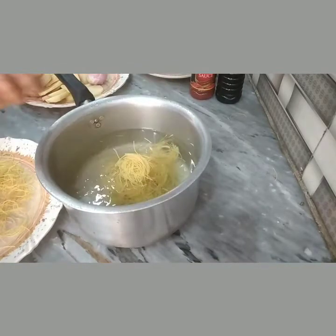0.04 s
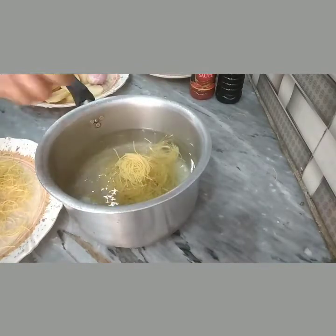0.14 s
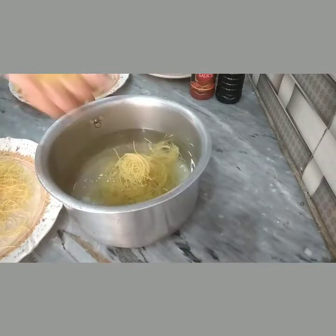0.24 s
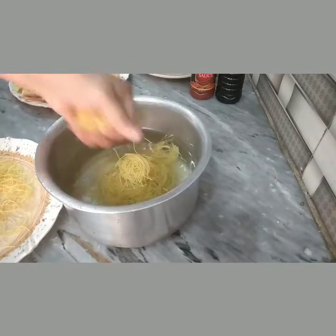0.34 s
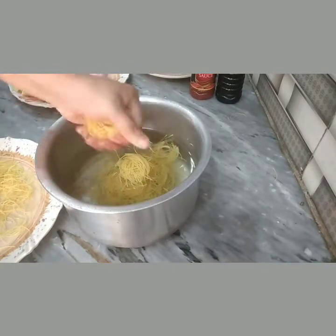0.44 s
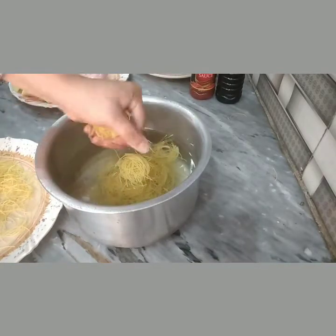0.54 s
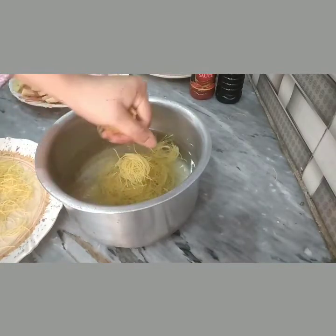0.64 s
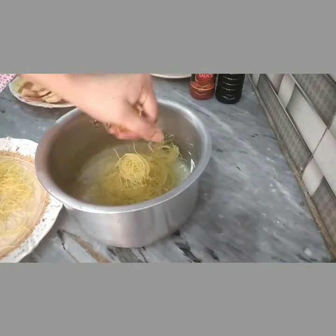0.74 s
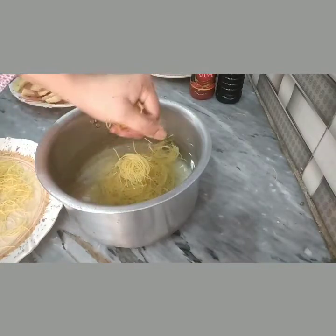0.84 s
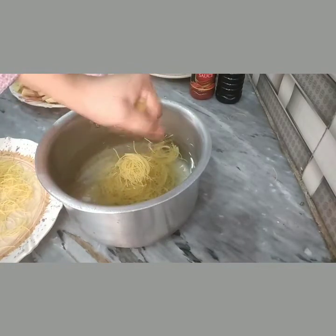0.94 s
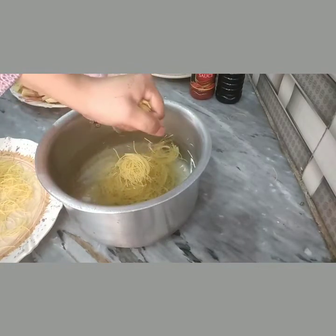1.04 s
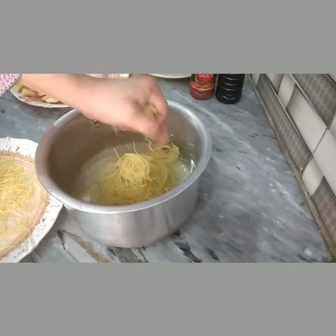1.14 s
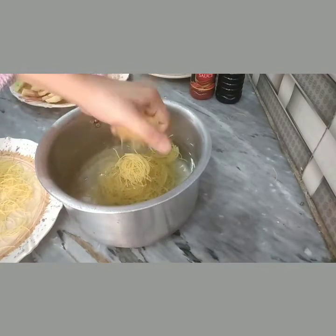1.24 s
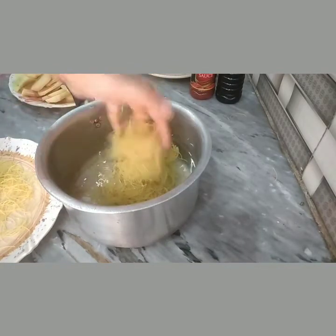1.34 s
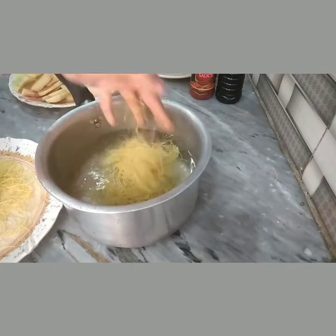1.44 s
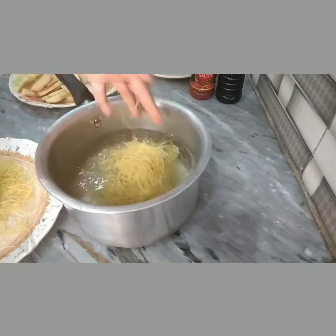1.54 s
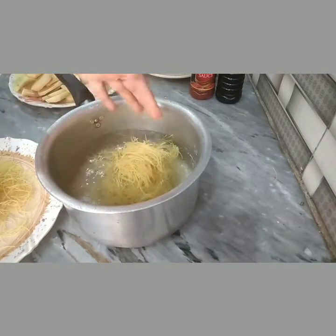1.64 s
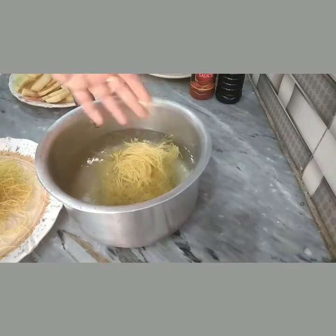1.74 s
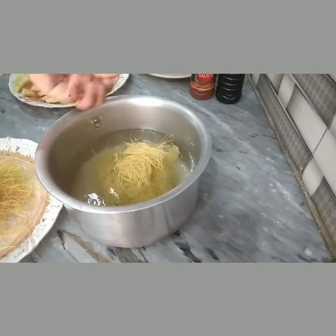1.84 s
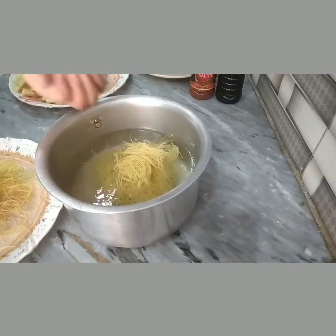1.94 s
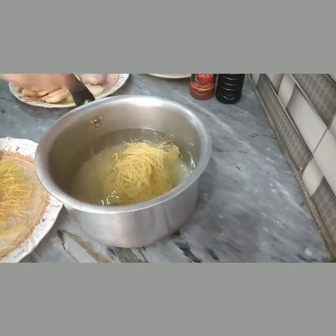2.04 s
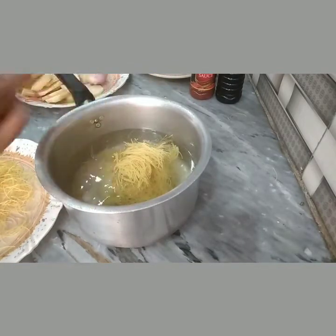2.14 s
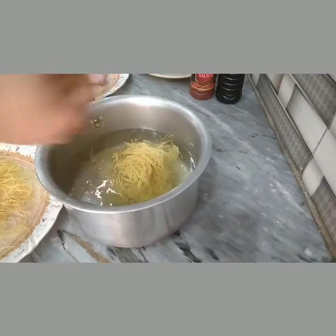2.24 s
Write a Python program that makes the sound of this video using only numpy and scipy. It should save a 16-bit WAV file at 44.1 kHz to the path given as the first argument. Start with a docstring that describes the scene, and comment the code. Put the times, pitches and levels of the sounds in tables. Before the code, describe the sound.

Thin dry noodles crackle and snap by hand, the pieces dropping softly into water.

```python
"""Dry thin pasta is crushed in a fist over a steel pot of water in a small kitchen.
Single strands snap over a bed of tiny fractures until the nest of pasta gives way.
The pot rings along, and the pieces patter onto the heap in the water, which gulps under them.
A low hum wavers underneath, with a rumble and a few soft bumps."""
import sys
import numpy as np
from scipy import signal
from scipy.fft import rfft, irfft
from scipy.io import wavfile
from scipy.ndimage import uniform_filter1d

SR = 44100
rng = np.random.default_rng(int(sys.argv[2]) if len(sys.argv) > 2 else 0)


def pcm_store(signal):
    """Save signal as 16-bit PCM."""
    levels = np.round(np.clip(np.atleast_2d(signal), -1, 1) * 32767)
    wavfile.write(sys.argv[1], SR, levels.astype(np.int16).T)


N = 101430
TIME = np.arange(N) / SR
LEFT_VS_RIGHT = np.array([[1], [-1]])  # adds on the left, subtracts on the right
SCATTER_DECAY_S = 0.004  # how fast reflections off the pot wall fade
THUD_DB, BREAK_PAN_DB = 20, -3.5  # the core of the nest breaks toward the right

# Levels in all tables are relative: each sound adds its own gain.
# Tone of a mid-pitched crunch: pitch_hz, level_db
CRUNCH_TONE = [(300, -32), (600, -21.5), (800, -22.5), (1100, -13.5), (1400, -9.5), (1750, -9), (2100, 4.5),
               (2400, -5), (2650, -0.5), (2900, -16.5), (3600, -12.5), (7000, -39.5)]
# Tone of bright splintering: pitch_hz, level_db
CRACK_TONE = [(1500, -52), (3000, -24.5), (4000, -5.5), (5000, -3), (5700, -8.5), (7500, 1.5), (11000, 0),
              (13000, -6), (16000, -11.5)]
# Tone of a dull thud: pitch_hz, level_db
THUD_TONE = [(120, -17.5), (250, -18), (350, -1.5), (480, 1.5), (640, 7), (780, 6.5), (1000, 5),
             (1500, -45), (4000, -59)]


def from_db(db):
    """Turns decibels into a gain to multiply by."""
    return 10 ** (np.asarray(db) / 20)


def gains(rows):
    """Turns rows of a time and levels into gain curves that die away quickly outside their span."""
    times, *columns = np.transpose(rows)
    outside_s = np.maximum(times[0] - TIME, 0) + np.maximum(TIME - times[-1], 0)
    return [from_db(np.interp(TIME, times, db)) * np.exp(-outside_s / 0.0039) for db in columns]


def colour(sound, tone, keep_power=True):
    """Filters a sound to a tone curve; with keep_power, white noise keeps its power."""
    size = 4096
    hz, db = np.transpose(tone)
    bin_hz = np.arange(size + 1) * SR / (2 * size)
    gain = from_db(np.interp(np.log(bin_hz + 1), np.log(hz), db))
    if keep_power:
        gain = gain / np.sqrt(np.mean(gain ** 2))
    # Fold the filter so that it rings only after a click, never before.
    cepstrum = irfft(np.log(gain))
    cepstrum[1:size] *= 2
    cepstrum[size + 1:] = 0
    response = irfft(np.exp(rfft(cepstrum)))[None, :size]
    return signal.fftconvolve(sound, response, axes=1)[:, :N]


def noise(side_db):
    """Stereo white noise; the lower side_db, the more alike the two ears."""
    middle, side = rng.standard_normal((2, N))
    return middle + from_db(side_db) * side * LEFT_VS_RIGHT


def steady(sound, window_s):
    """Evens out the slow swings of a noise."""
    power = uniform_filter1d(np.mean(sound ** 2, axis=0), int(window_s * SR))
    return sound / np.sqrt(power + 1e-12)


def grains(per_s, spread_db, haze_db):
    """Tiny clicks of uneven size, each from its own direction, in a haze of their reflections."""
    count = int(N / SR * per_s)
    when, size, sign, side = rng.random((4, 30000))[:, :count]
    height = from_db(-spread_db * np.log(np.maximum(size, .03))) * np.sign(sign - .5)
    clicks = np.zeros((2, N))
    for ear, lag_s in enumerate((0, .0001 * (2 * side - 1))):
        np.add.at(clicks[ear], (when * N + lag_s * SR).astype(int) % N, height)
    fade = np.exp(-1 / (SCATTER_DECAY_S * SR))
    haze_power = signal.lfilter([1 - fade], [1, -fade], clicks[0] ** 2)
    haze = np.sqrt(haze_power) * rng.standard_normal((2, N))
    sound = clicks + from_db(haze_db) * haze
    return sound / sound.std()


def background():
    """A wavering hum, a low rumble and the dull air of the kitchen, all made of filtered noise."""
    # How the low sounds waver: time_s, hum_db, rumble_db
    low_levels = [(0, -61, -66.5), (.2, -60.5, -73), (.27, -52, -68), (.33, -55, -76), (.45, -56.5, -68),
                  (.56, -55, -71), (.68, -63, -67), (.79, -48.5, -58), (.84, -60, -60.5), (.93, -48.5, -66),
                  (1.0, -50, -57), (1.13, -58.5, -69.5), (1.28, -55.5, -61.5), (1.46, -50, -67.5),
                  (1.53, -52.5, -69), (1.68, -48, -63.5), (1.76, -56.5, -70), (1.86, -53.5, -66.5),
                  (1.92, -67, -72), (1.99, -56.5, -65), (2.08, -51, -73), (2.16, -62.5, -68.5),
                  (2.22, -59, -72.5), (2.27, -43, -59.5), (2.3, -53, -68)]
    # Tones of the hum, the rumble and the air: pitch_hz, level_db
    hum_tone = [(60, -45.5), (120, -44.5), (145, 1.5), (166, 1.5), (190, -13.5), (260, -26), (500, -74)]
    rumble_tone = [(15, -13), (38, 4.5), (52, -17), (75, 3.5), (92, 3), (120, 1), (200, -33), (500, -71.5)]
    air_tone = [(100, -6.5), (250, 5), (400, 4), (700, 0), (1200, -6.5), (2300, -14), (3000, -26.5),
                (3800, -44), (16000, -55)]
    hum_gain, rumble_gain = gains(low_levels)
    hum = hum_gain * steady(colour(noise(side_db=-15), hum_tone), window_s=0.11)
    rumble = rumble_gain * steady(colour(noise(side_db=-9), rumble_tone), window_s=0.031)
    air = colour(noise(side_db=-2), air_tone)
    return from_db(5.5) * hum + from_db(13.5) * rumble + from_db(-61) * air


def loose_pieces():
    """Strands rustle in the hand, and later pieces rain on the heap and the water."""
    # Strands shift as the hand comes in: time_s, level_db
    rustle_levels = [(0.04, -93), (0.07, -57), (0.08, -43.5), (0.11, -59), (0.135, -51), (0.19, -66)]
    # Pieces fall on the heap: time_s, treble_db, mids_db
    fall_levels = [(1.15, -75, -78), (1.17, -49.5, -43.5), (1.252, -46, -44.5), (1.35, -45.5, -35),
                   (1.438, -47.5, -49.5), (1.622, -51, -51.5), (1.632, -47.5, -44), (1.67, -47, -40.5),
                   (1.682, -46.5, -46.5), (1.738, -52.5, -51.5), (1.774, -50.5, -48), (1.804, -65, -68.5),
                   (1.846, -69.5, -59), (1.875, -100, -100)]
    # Tones of the dry patter and the wet splash: pitch_hz, level_db
    patter_tone = [(1500, -4.5), (3000, -5), (4200, -20.5), (5200, 3), (6000, -1), (7500, 5), (9000, 1.5),
                   (11000, 0.5), (13000, -8), (16000, -12)]
    splash_tone = [(120, -13), (260, -11), (370, -22), (520, -29), (850, -15), (1150, 9.5), (1600, 8),
                   (2100, 9.5), (2600, 9), (3200, 2.5), (5000, -2), (9000, -70)]
    rustle, = gains(rustle_levels)
    treble, mids = gains(fall_levels)
    patter = colour(grains(per_s=3200, spread_db=4, haze_db=21.5) * (rustle + treble), patter_tone)
    splash = colour(grains(per_s=1500, spread_db=4, haze_db=24) * mids, splash_tone)
    crinkle = colour(grains(per_s=1500, spread_db=0.5, haze_db=4) * rustle, CRUNCH_TONE)
    return from_db(1.05 * LEFT_VS_RIGHT) * patter + from_db(-0.5) * splash + from_db(-7) * crinkle


def pot_ring(sound):
    """The steel wall rings at its own pitches when a sound reaches it."""
    # The pot's notes: pitch_hz, level_db, ring_s (time to fade by 60 dB)
    notes = [(754, 0, .18), (1363, -5, .25), (1522, -1, .25), (1594, -3, .25), (1652, -3, .25),
             (1784, 3, .33), (1839, -3, .4), (1918, -3, .35), (1989, 5, .4), (2031, 0, .25), (2126, -6, .3),
             (2362, -8, .3), (2591, 2, .25), (3046, -3, .25), (4975, -6, .2)]
    ring = np.zeros((2, N))
    for pitch_hz, level_db, ring_s in notes:
        fade = from_db(-60 / (ring_s * SR))
        feed = np.array([1, 0, -1]) * (1 - fade ** 2) / 2
        feedback = [1, -2 * fade * np.cos(2 * np.pi * pitch_hz / SR), fade ** 2]
        ring += from_db(level_db - 2) * signal.lfilter(feed, feedback, sound + 1e-18)
    return ring


def room_echoes(sound, ring_s, delay_s):
    """The kitchen returns a blur of echoes, different at each ear, that fades 60 dB in ring_s."""
    age = TIME[:SR // 2]
    tail = rng.standard_normal((2, len(age))) * np.exp(-np.log(1000) * age / ring_s) * (age > delay_s)
    tail /= np.sqrt(np.sum(tail ** 2) / 2)
    return signal.fftconvolve(sound, tail, axes=1)[:, :N]


def knock(click, low_hz, top_hz):
    """The dull body of a snap: a band of pitches that rings briefly at each edge."""
    edges = signal.cheby1(2, 4, [low_hz, top_hz], "band", fs=SR, output="sos")  # 4 dB edge peaks
    skirts = signal.butter(3, [.85 * low_hz, 1.15 * top_hz], "band", fs=SR, output="sos")
    return signal.sosfilt(np.vstack([edges, skirts]), click)


def snaps_and_landings():
    """Each break or landing knocks and splinters, scattered by the pot wall; the core also thuds."""
    # Faint ticks of loose strands: start_s, level_db
    ticks = [(0.0756, -46), (2.118, -63.5)]
    # Single strands snap: start_s, low_hz, top_hz, knock_db, crack_db
    strand_snaps = [(0.1975, 1100, 2600, 0, -35), (0.2081, 950, 2600, -2, -36), (0.2177, 700, 2450, 5, -29),
                    (0.2307, 650, 2650, 4, -27), (0.2489, 1900, 2450, 7, -29),
                    (0.2664, 1950, 2400, 11, -28), (0.272, 1100, 2400, 6, -28), (0.2853, 850, 2450, 8, -33),
                    (0.2923, 950, 2500, 9, -32), (0.3003, 1950, 2600, 6, -32), (0.3054, 950, 2450, -3, -30),
                    (0.3155, 950, 2700, 3, -31), (0.3398, 1350, 2600, 5, -29),
                    (0.3543, 1200, 2700, -4, -37), (0.3905, 1150, 2700, 5, -36),
                    (0.3925, 1150, 2700, 8, -32), (0.4045, 1250, 2550, 3, -30),
                    (0.4247, 1300, 2900, 9, -35), (0.4451, 1450, 2800, -3, -32),
                    (0.4795, 1050, 2700, 0, -27), (0.4924, 1450, 3050, 6, -32),
                    (0.5119, 1350, 2850, 2, -30), (0.5352, 1050, 2200, 0, -29), (0.5479, 900, 2750, 9, -24),
                    (0.5798, 1800, 2950, 10, -33), (0.5943, 800, 2600, 7, -32),
                    (0.6087, 1250, 2900, 5, -35), (0.6395, 1200, 3000, 2, -33),
                    (0.6954, 1950, 2650, -3, -25), (0.7145, 700, 3050, -5, -25),
                    (0.7497, 750, 2950, -2, -28), (0.7819, 1400, 2900, -3, -30),
                    (0.792, 1800, 2750, 3, -29), (0.8115, 1850, 2750, 1, -29), (0.8348, 850, 2650, 2, -28),
                    (0.8504, 700, 2500, 4, -29), (0.9114, 1500, 2800, 6, -26),
                    (0.9518, 1550, 2900, 13, -27)]
    # The core of the nest breaks: start_s, low_hz, top_hz, knock_db, crack_db, thud_db
    core_breaks = [(0.9957, 1400, 2300, 13, -22, -25), (0.9988, 1500, 2700, 14, -20, -15),
                   (1.0034, 1500, 2150, 19, -21, -14), (1.008, 900, 2000, 13, -25, -32),
                   (1.0152, 1300, 2050, 17, -26, -33), (1.0215, 1400, 2050, 17, -24, -33),
                   (1.0475, 800, 2250, 9.5, -30, -45)]
    # Clumps land on the heap: start_s, low_hz, knock_db
    clump_landings = [(1.298, 1250, -5), (1.3264, 1400, -6), (1.364, 1200, -6), (1.631, 1400, -8),
                      (1.6477, 1100, -8), (1.66, 1200, -7), (1.669, 1300, -7), (1.7689, 1500, -14),
                      (1.8253, 1700, -19), (1.8472, 1100, -18), (2.055, 1600, -28)]
    knock_gain_db, crack_gain_db = 1, 14.5
    # The strands' knocks get a level offset that falls steadily with time.
    knock_start_db, knock_db_per_s = 3, -6.5
    landing_top_hz, landing_crack_db = 2360, -52
    knocks, cracks, thuds = np.zeros((3, 2, N))
    age = TIME[:2000]

    def burst(decay_s):
        """Fading stereo noise with an energy of 1 in each ear."""
        hiss = rng.standard_normal((2, len(age))) * np.exp(-age / decay_s)
        return hiss / np.sqrt(np.sum(hiss ** 2, axis=1, keepdims=True))

    def span(start_s):
        """The samples that one event fills."""
        return slice(int(start_s * SR), int(start_s * SR) + len(age))

    strands = [(start_s, low_hz, top_hz, knock_db + knock_start_db + knock_db_per_s * start_s, crack_db)
               for start_s, low_hz, top_hz, knock_db, crack_db in strand_snaps]
    landings = [(start_s, low_hz, landing_top_hz, knock_db, knock_db + landing_crack_db)
                for start_s, low_hz, knock_db in clump_landings]
    for start_s, low_hz, top_hz, knock_db, crack_db, *thud_db in strands + list(core_breaks) + landings:
        click = (age == 0) + from_db(-2) * burst(SCATTER_DECAY_S)
        if thud_db:
            click = click * from_db(BREAK_PAN_DB * LEFT_VS_RIGHT)
            thuds[:, span(start_s)] += from_db(thud_db[0] + THUD_DB) * click
        knocks[:, span(start_s)] += from_db(knock_db + knock_gain_db) * knock(click, low_hz, top_hz)
        splinters = burst(decay_s=0.00096) + from_db(3.5) * burst(SCATTER_DECAY_S)
        cracks[:, span(start_s)] += from_db(crack_db + crack_gain_db) * splinters
    for start_s, level_db in ticks:
        cracks[:, span(start_s)] += from_db(level_db + crack_gain_db) * burst(decay_s=.011)
    return knocks + colour(cracks, CRACK_TONE) + colour(thuds, THUD_TONE)


def crumbling():
    """Thousands of tiny fractures follow the squeeze of the fist."""
    # How loud the crumbling is: time_s, mids_db, treble_db, lows_db
    crumble_levels = [(.19,-54,-50,-70), (.2,-40,-42.5,-61), (.235,-38.5,-39,-44.5),
                      (.26,-31.5,-37.5,-50.5), (.3,-31.5,-40,-61), (.345,-39.5,-38.5,-69),
                      (.383,-40,-44.5,-58), (.41,-35.5,-47,-65), (.43,-31,-39,-51.5), (.46,-44.5,-42,-71),
                      (.475,-30,-34.5,-62.5), (.535,-33,-32,-53), (.555,-25,-36.5,-43.5),
                      (.605,-27,-33.5,-46.5), (.654,-30.5,-36,-63.5), (.688,-51,-56,-74),
                      (.71,-41.5,-39,-75.5), (.752,-27,-35.5,-52.5), (.825,-40.5,-39.5,-64.5),
                      (.858,-20,-25.5,-42), (.902,-28.5,-31,-46.5), (.955,-17.5,-24.5,-44.5),
                      (.985,-18,-24.5,-33.5), (1.005,-18.5,-23,-29.5), (1.025,-15.5,-28.5,-36),
                      (1.052,-23.5,-31,-36), (1.08,-31,-40,-46), (1.17,-47.5,-52,-65)]
    # Hollow tone of the low crumbling: pitch_hz, level_db
    hollow_tone = [(200, -35.5), (430, -14.5), (540, -14.5), (660, -10.5), (760, 5.5), (880, -4),
                   (1100, -0.5), (1600, -11.5), (4000, -55)]
    mids, treble, lows = gains(crumble_levels)
    coarse = steady(grains(per_s=1500, spread_db=-3, haze_db=0.5), window_s=0.04)
    fine = steady(grains(per_s=3600, spread_db=-2, haze_db=-2), window_s=0.076)
    deep = steady(grains(per_s=1500, spread_db=3.5, haze_db=2.5), window_s=0.025)
    return (from_db(-4) * colour(coarse * mids, CRUNCH_TONE)
            + from_db(-1) * colour(fine * treble, CRACK_TONE)
            + from_db(8) * colour(deep * lows, hollow_tone))


def first_thuds():
    """The first strands give way with dull thuds as the fist closes."""
    # The thuds: start_s, level_db
    thuds = [(0.2177, -37.5), (.2307, -33)]
    clicks = np.zeros((2, N))
    for start_s, level_db in thuds:
        clicks[:, int(start_s * SR)] = from_db(level_db + THUD_DB)
    return colour(clicks, THUD_TONE)


def bumps_and_gulps():
    """Soft bumps and the gulps of the water: low tones that swell and fade within a few cycles."""
    # Soft low bumps: start_s, pitch_hz, level_db
    bumps = [(.355, 100, -39), (.71, 96, -36.5), (.775, 101, -33.5), (.89, 85, -35.5), (.94, 87.2, -34.5),
             (1.97, 89, -39), (2.255, 163, -51)]
    # The water gulps under the falling pasta: start_s, pitch_hz, level_db
    gulps = [(1.316, 162, -33.5), (1.332, 252, -44), (1.388, 173, -35), (1.643, 163, -32)]
    rise_s = 0.0072
    sound = np.zeros(N)
    for start_s, pitch_hz, level_db in bumps + gulps:
        age = np.maximum(TIME - start_s, 0)
        swell = age / rise_s * np.exp(1 - age / rise_s)
        sound += from_db(level_db) * swell * np.sin(2 * np.pi * pitch_hz * age)
    return sound


def pot_jolt(start_s, level_db):
    """The hardest break of the core gives the pot one sharp push."""
    push = np.arange(N) == int(start_s * SR)
    return from_db(level_db + BREAK_PAN_DB * LEFT_VS_RIGHT) * push


def scene():
    """The pasta sounds into the pot and the room, over the low sounds."""
    pasta = snaps_and_landings() + first_thuds() + crumbling() + loose_pieces()
    pot = pot_ring(pasta + pot_jolt(start_s=1.004, level_db=19))
    room = from_db(-13.5) * room_echoes(pasta, ring_s=0.076, delay_s=0.024)
    return pasta + pot + room + bumps_and_gulps() + background()


def record(dry):
    """Each microphone opening has its own resonance; peaks are rounded and the top treble is cut."""
    # Tones of the left and right openings: pitch_hz, level_db
    left_tone = [(300, -2.5), (800, -3.5), (2000, -1), (4000, -1.5), (6000, 6.5), (7300, 6), (8500, -1.5),
                 (10000, -7.5), (12000, -8.5), (16000, 2)]
    right_tone = [(300, -1.5), (800, -5.5), (2000, 0), (4000, -2.5), (6000, 3), (7300, -1), (8500, -3),
                  (10800, 7), (12500, 4.5), (16000, 5)]
    ceiling, cutoff_hz = .9, 15900
    left = colour(dry[:1], left_tone, keep_power=False)
    right = colour(dry[1:], right_tone, keep_power=False)
    rounded = ceiling * np.tanh(np.vstack([left, right]) / ceiling)
    treble_cut = signal.ellip(12, .2, 80, cutoff_hz, fs=SR, output="sos")
    return signal.sosfilt(treble_cut, rounded)


dry = scene()
out = record(dry)
pcm_store(out)
```